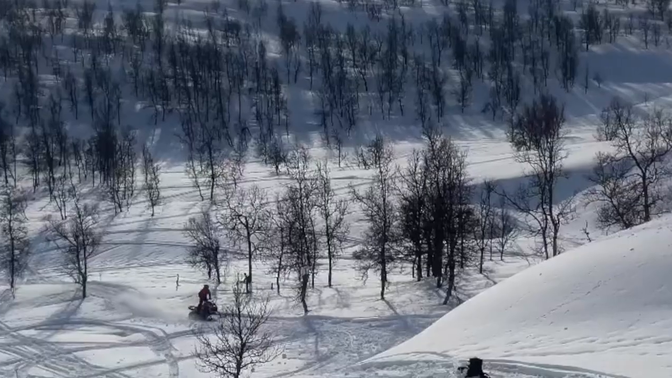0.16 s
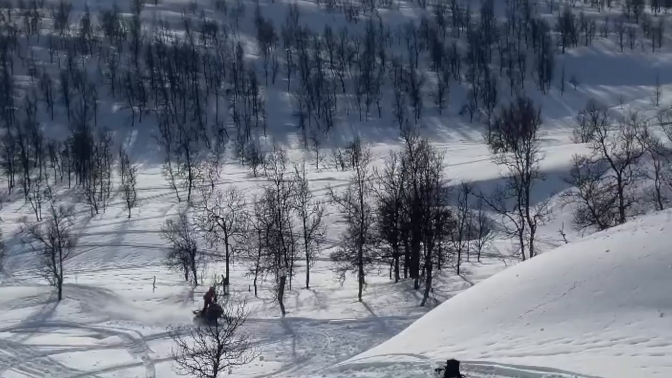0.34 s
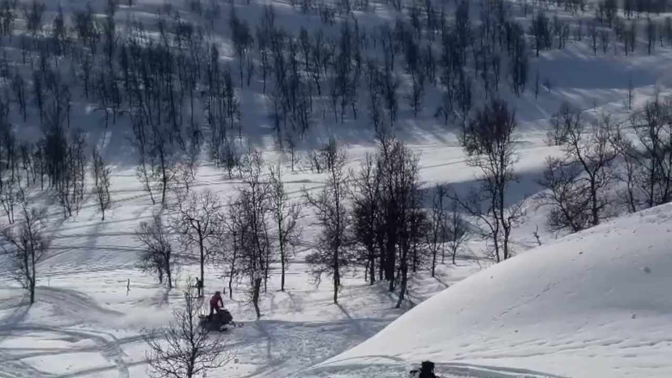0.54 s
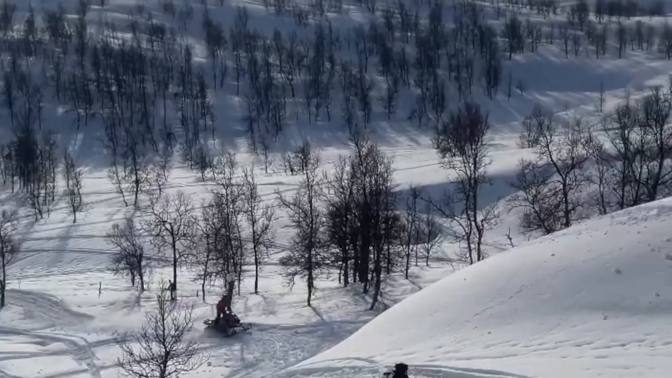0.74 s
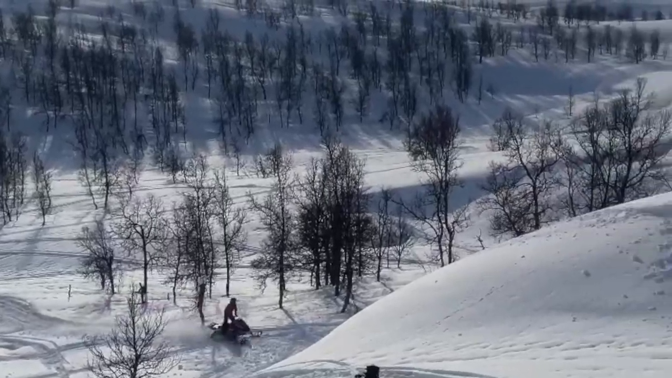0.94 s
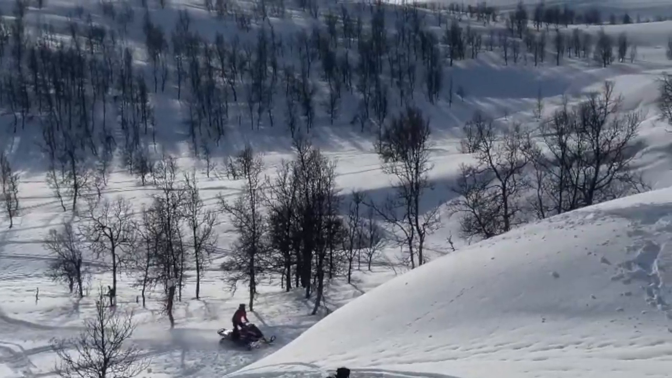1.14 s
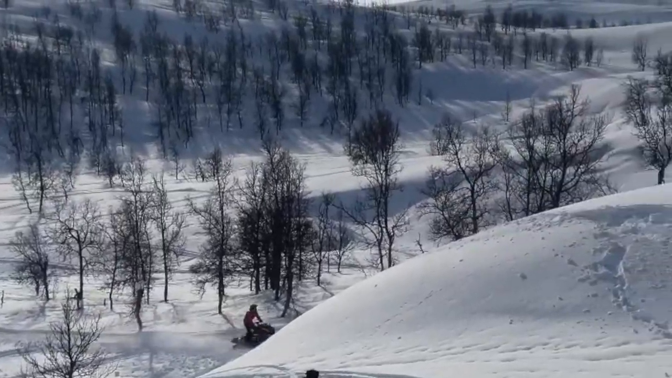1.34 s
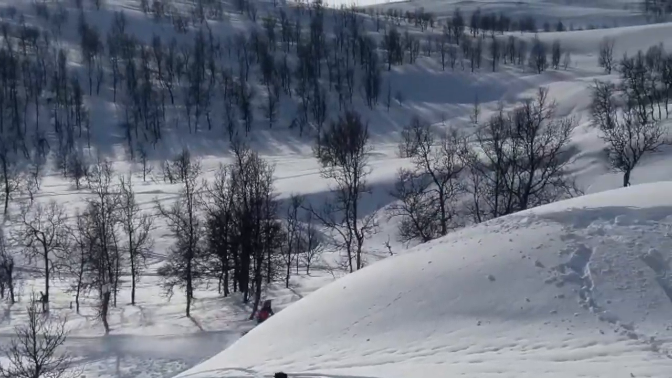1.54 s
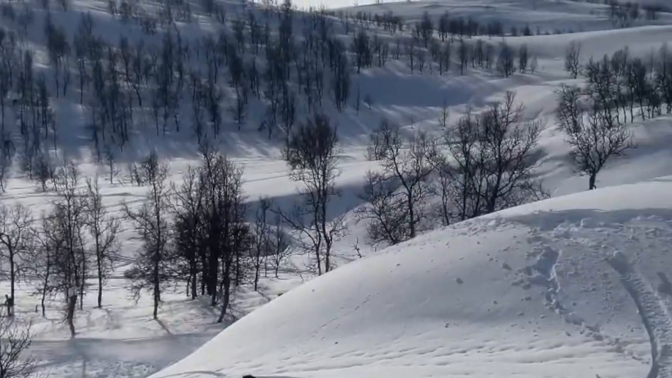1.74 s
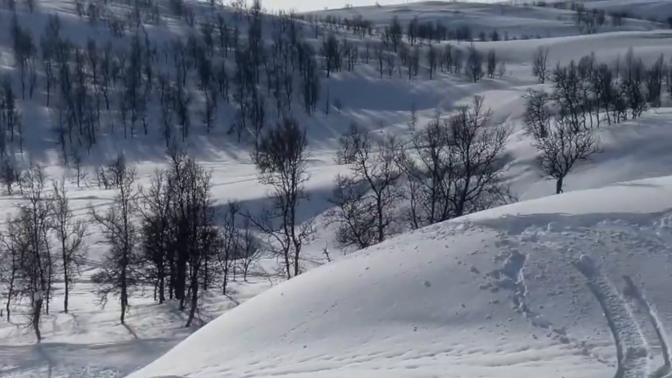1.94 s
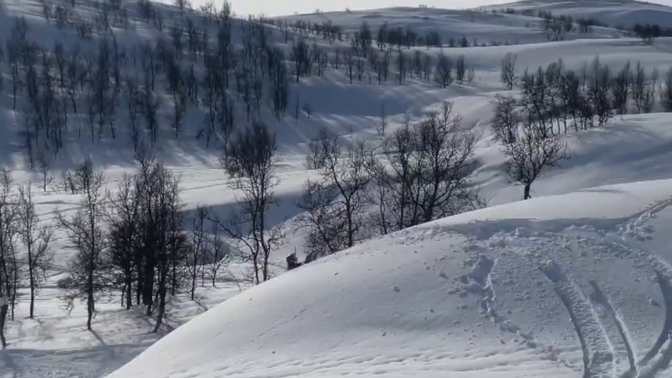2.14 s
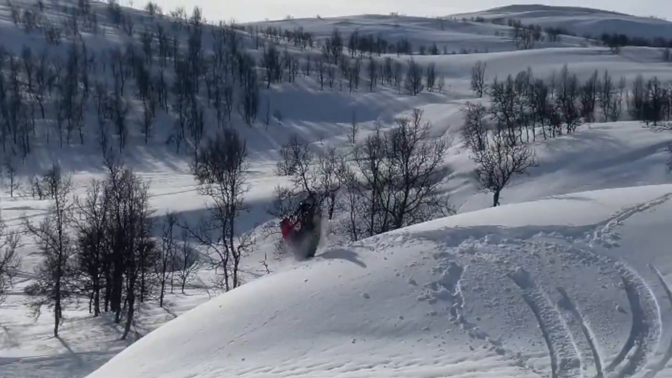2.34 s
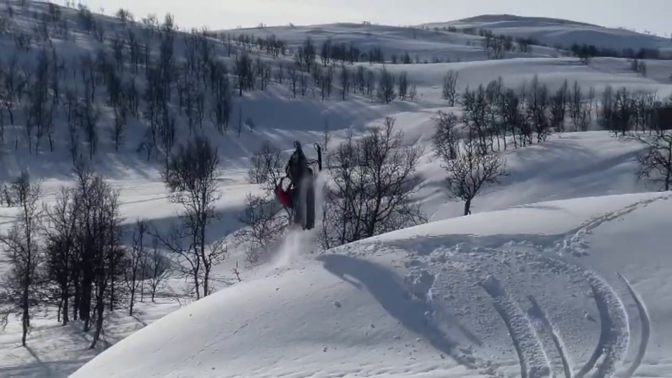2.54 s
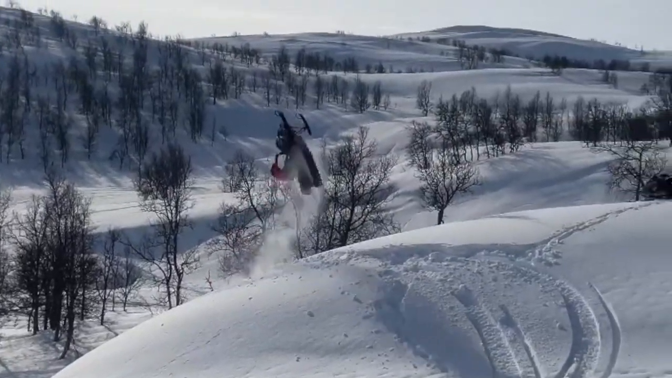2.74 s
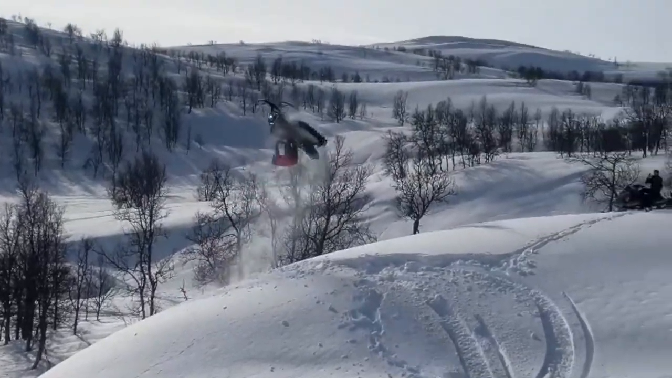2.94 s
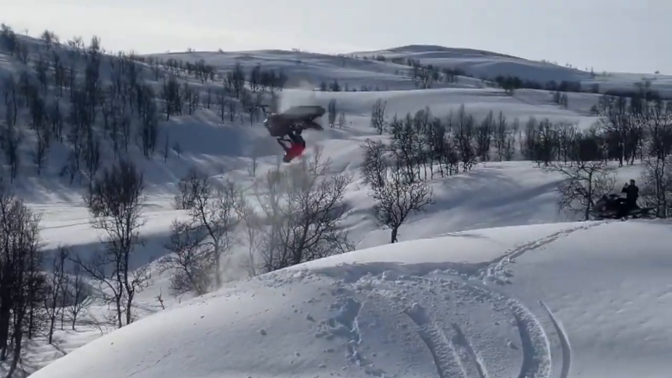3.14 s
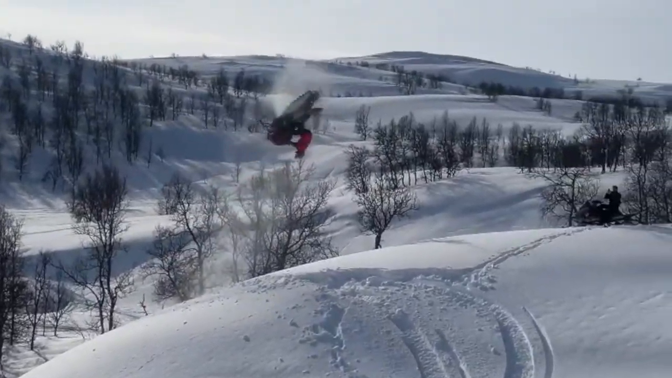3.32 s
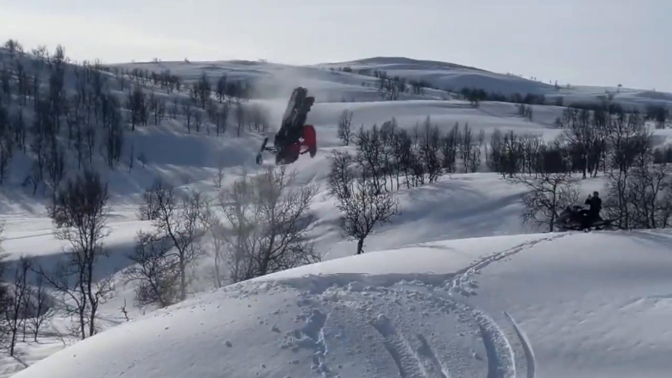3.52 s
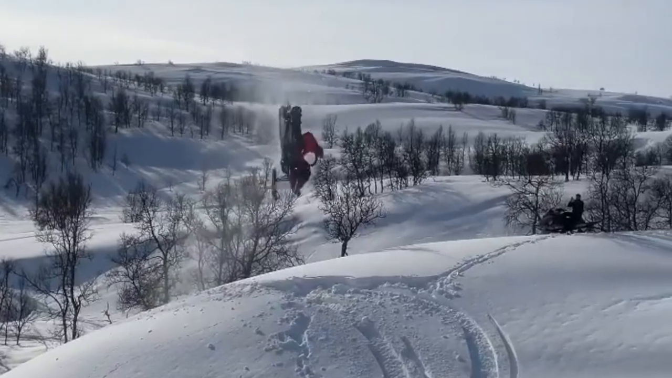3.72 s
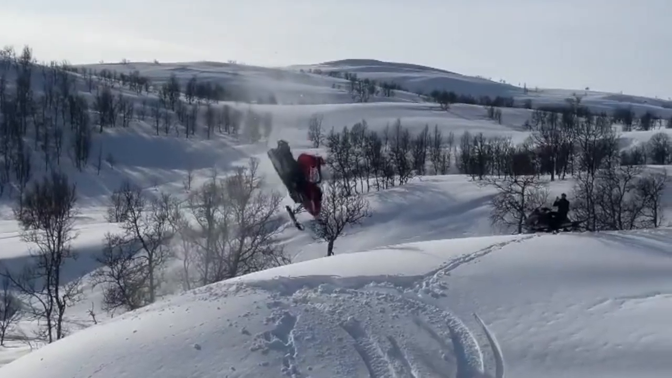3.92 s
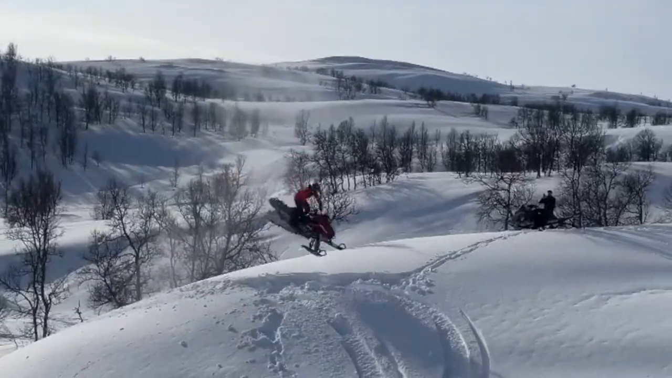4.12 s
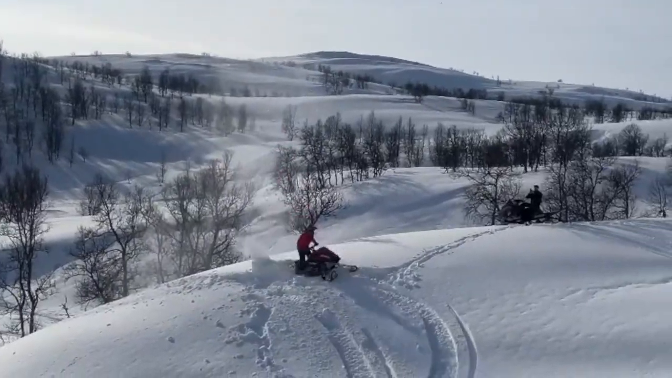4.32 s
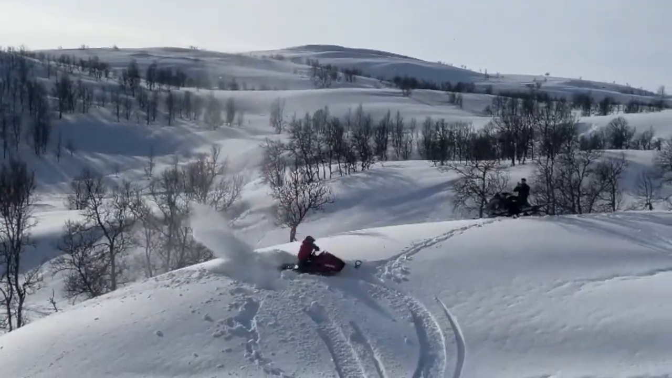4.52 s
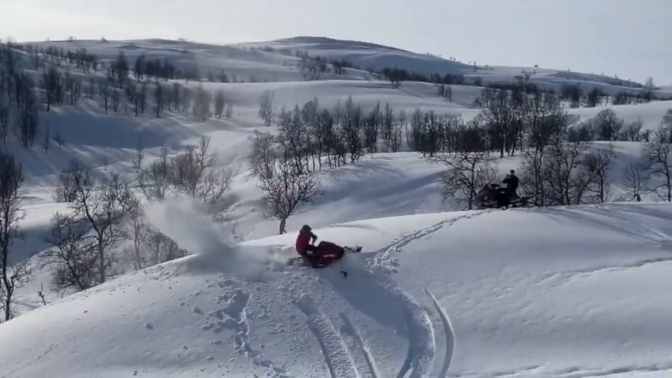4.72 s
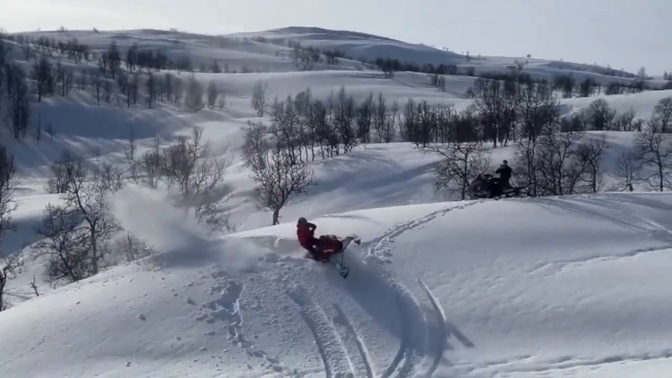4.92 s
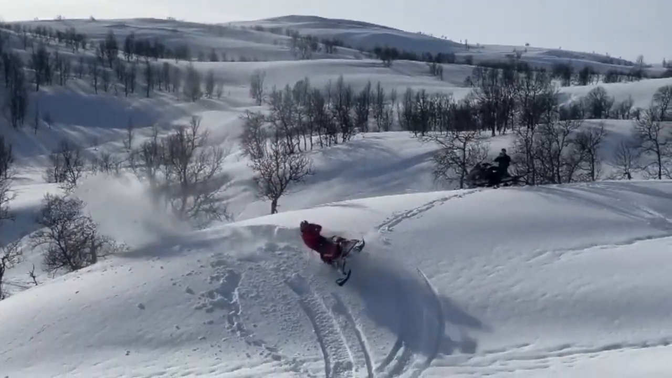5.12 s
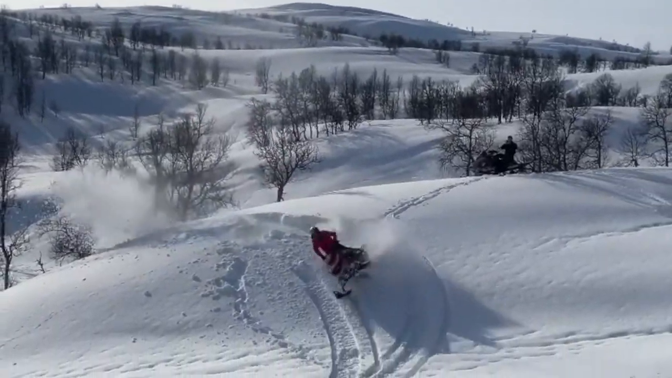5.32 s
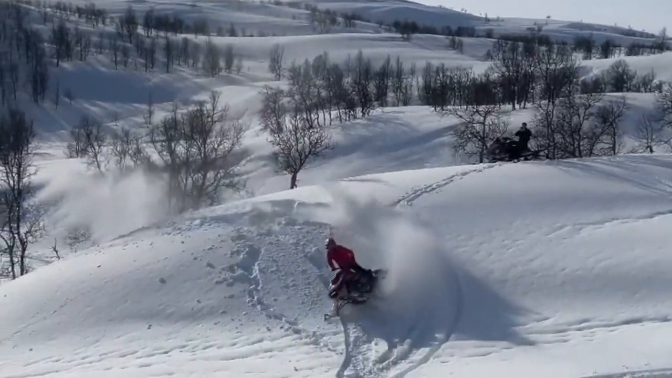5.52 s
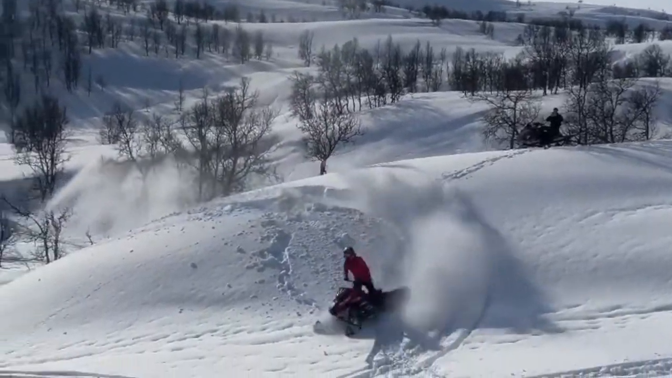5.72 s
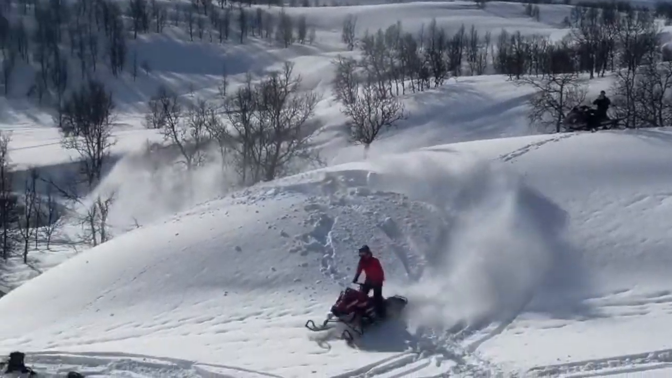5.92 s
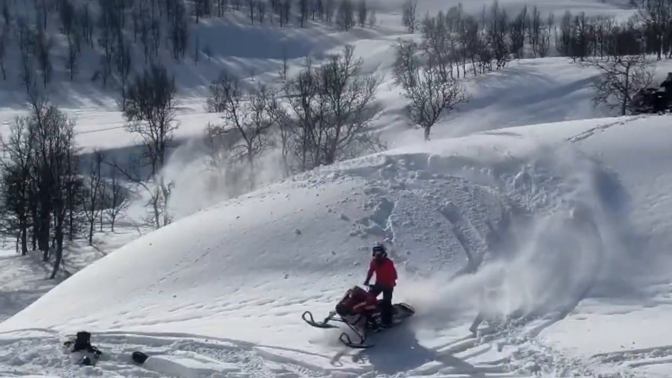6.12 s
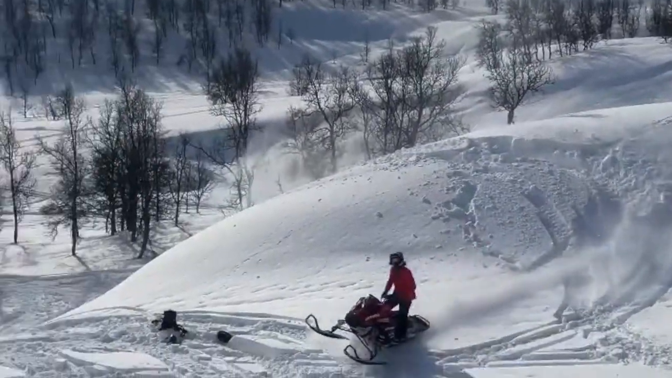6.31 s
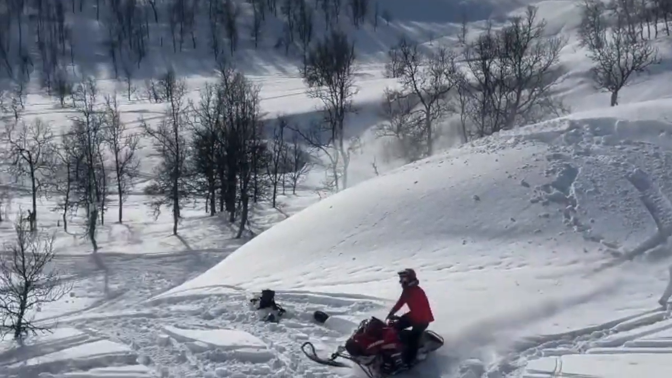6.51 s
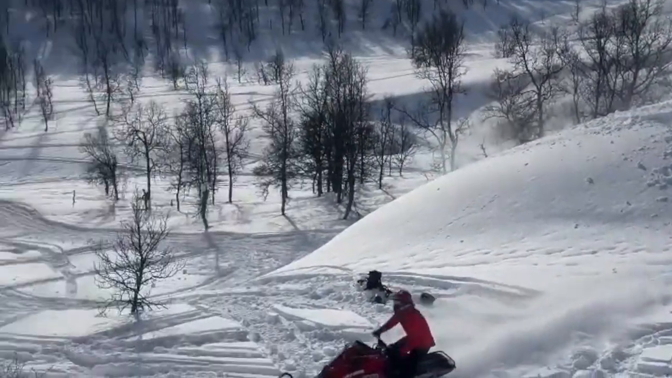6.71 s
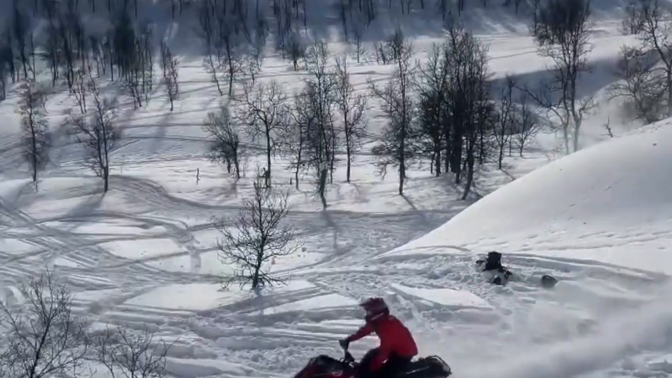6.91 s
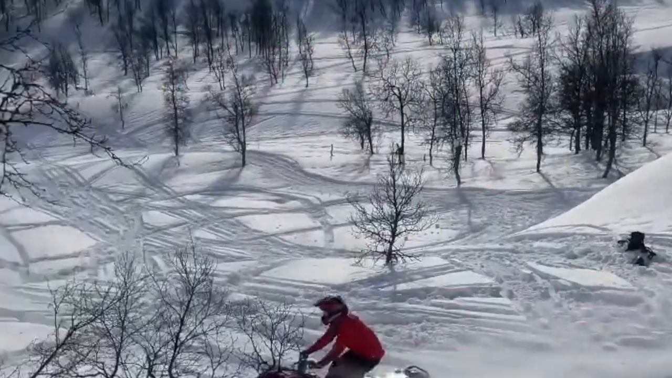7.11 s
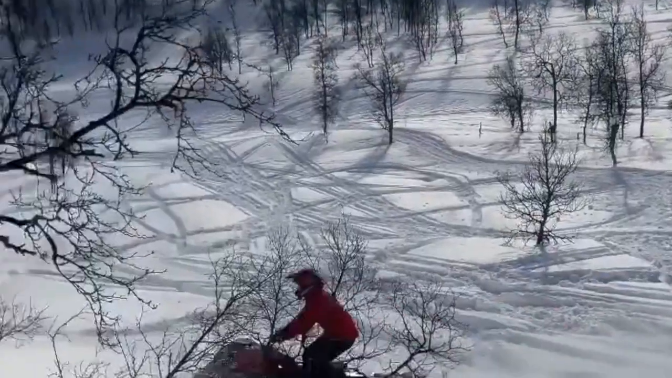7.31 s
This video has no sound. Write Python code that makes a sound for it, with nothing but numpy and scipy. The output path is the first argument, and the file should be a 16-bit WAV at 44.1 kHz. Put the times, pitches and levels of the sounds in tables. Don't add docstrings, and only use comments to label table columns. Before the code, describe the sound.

A snowmobile heard from a close handheld stereo microphone on a snowy slope: after an abrupt engine snippet and gap, thin nasal revs rise and dip far away. A sudden full-throttle blare follows, easing in pulses while the track whirs upward and wind buffets. Dull landing blows, renewed revving and churning spray come nearer, then only falling track whine, low wind and a last knock.

```python
import sys
import numpy as np
from scipy import signal
from scipy.fft import rfft, irfft
from scipy.io import wavfile
from scipy.ndimage import uniform_filter1d

SR = 44100
rng = np.random.default_rng(int(sys.argv[2]) if len(sys.argv) > 2 else 0)


def waveform_to_disk(signal):
    frames = np.transpose(np.atleast_2d(signal))
    scaled = np.clip(frames, -1, 1) * 32767
    samples = np.round(scaled).astype(np.int16)
    wavfile.write(sys.argv[1], SR, samples)


def ratio_of_db(decibels):
    return 10 ** (np.asarray(decibels, float) / 20)


N = 328913
T = np.arange(N) / SR
HZ = np.fft.rfftfreq(N, 1 / SR)


def colour(table, hz):
    f, v = np.transpose(table)
    return np.interp(np.log(hz + 1), np.log(f + 1), v)


def on_hz(table):
    return colour(table, HZ)


def columns(*tables):
    s, *cols = np.transpose(np.vstack(tables))
    return [np.interp(T, s, c) for c in cols]


def unit(x):
    return x / np.sqrt(np.mean(x ** 2))


def walk(rate):
    k = int(SR / rate)
    held = np.repeat(rng.standard_normal(N // k + 1), k)
    slewed = uniform_filter1d(uniform_filter1d(held, k), k)
    return 1.4 * slewed[:N]


def window(t0, t1, fade):
    return np.clip(np.minimum(T - t0, t1 - T) / fade, 0, 1)


def bumps(rows):
    return sum(db * np.exp(-((T - s) / half_s) ** 2) for s, half_s, db in rows)


def order(turns, k, db, fade_db, lag):
    level = np.sqrt(2) * ratio_of_db(db + fade_db * walk(12))
    phase = 2 * np.pi * k * turns - lag * k + .3 * walk(25)
    return level * np.sin(phase)


# frequency in Hz, likeness 0-1.
PORT_LIKENESS = [(60, .99), (500, .98), (1000, .95), (2000, .78), (4000, .8), (8000, .7)]


def noise(spectrum, lo_hz, hi_hz, flicker_db):
    shape = ratio_of_db(on_hz(spectrum))
    alike = np.clip(on_hz(PORT_LIKENESS), -1, 1)
    mid, side = rfft(rng.standard_normal((2, N)))
    mid, side = mid * np.sqrt(1 + alike), side * np.sqrt(1 - alike)
    pair = shape * np.array([mid + side, mid - side])
    out = 0
    for centre in np.arange(np.log2(lo_hz) - 2, np.log2(hi_hz) + 2, 1.):
        band = np.cos(np.pi / 2 * np.clip(np.log2(HZ + 1) - centre, -1, 1)) ** 2
        out = out + irfft(pair * band, N) * ratio_of_db(flicker_db * walk(14))
    inside = irfft(shape * mid * (HZ > lo_hz) * (HZ < hi_hz), N)
    return out / np.sqrt(np.mean(inside ** 2))


# start in seconds, firing rate aimed at in Hz, time constant in seconds,
# exhaust level aimed at in dB.
THROTTLE_MOVES = [(0.168, 220.4, 0.036, -38), (0.234, 311.2, 0.258, -21), (0.41, 247.8, 0.042, -31.5),
                  (0.527, 215.3, 0.093, -37), (0.645, 215, 0.086, -35.5), (0.91, 244, 0.15, -30.5),
                  (1.063, 208.9, 0.049, -38), (1.209, 270.4, 0.5, -36), (1.364, 197.1, 0.094, -43.5),
                  (1.541, 296.6, 0.29, -25), (1.672, 204, 0.12, -40), (1.921, 306.6, 0.31, -36.5),
                  (2.161, 267.5, 0.56, 0.5), (2.349, 287.8, 0.063, -12), (2.542, 258.3, 0.49, -5),
                  (2.806, 245.1, 0.039, -17), (2.86, 252.2, 0.09, -14), (3.189, 273.5, 0.16, -13),
                  (3.494, 246.7, 0.056, -21), (3.676, 268.6, 0.17, -17), (4.052, 235.6, 0.041, -27.5),
                  (4.145, 246.4, 0.08, -13), (4.347, 170.1, 0.12, -29), (4.473, 295.7, 0.39, -19.5),
                  (4.64, 284.2, 0.088, -16.5), (5.339, 260.1, 0.4, -9.5), (5.633, 267.8, 0.065, -21.5),
                  (5.833, 292.5, 0.24, -13), (6.176, 278.7, 0.32, -13.5), (6.571, 234.5, 0.058, -12)]


def throttle():
    out = np.zeros((2, N))
    out[:] = [[227.3], [-33.5]]
    for s, hz, lag_s, db in THROTTLE_MOVES:
        i = int(s * SR)
        aim = np.array([[hz], [db]])
        lag = lag_s * np.array([[1], [0.37]])
        out[:, i:] = aim + (out[:, i - 1:i] - aim) * np.exp(-(T[i:] - s) / lag)
    return out


# time in seconds, nearness in dB, pipe turned this way in dB,
# pipe clear of the snow in dB, silencer in view in dB.
SLED_POSE = [(.2, 2, -9, 4, 6), (.5, 6, -5, -4, -5), (1.02, 1, -1.5, 6, 1), (1.35, 2, 0.5, 5, 12.5),
             (1.6, 0.5, -5.5, -1.5, -9), (2.2, -3.5, -4.5, -9, -4), (2.34, 6.5, -3.5, 0.5, 0),
             (2.7, -3, 3, 0.5, 1.5), (3.0, 0, 3.5, -2, 7.5), (3.4, 2.5, -9.5, -1.5, -9),
             (3.7, -4.5, 6, 2, -0.5), (4.25, -1, 2.5, -4.5, -2.5), (4.64, -14.5, 5, 6.5, -3),
             (5.0, 0.5, 3, 1, 9), (5.45, 0, 3, 6, 8), (5.75, 3, -10, -9, -5), (5.95, -1.5, 6.5, 6.5, 10.5),
             (6.4, 0, 6, 0.5, 4)]
# centre in seconds, half width in seconds, depth in dB.
SNOW_CANCELS = [(1.2, 0.056, -5), (1.72, 0.1, -4.5), (2.57, 0.053, -9), (3.11, .02, -5.5),
                (3.54, 0.013, -12), (4.84, 0.098, -2.5), (5.9, 0.066, -2), (6.36, 0.19, -13)]
# time in seconds, roughness 0-1.
FIRING_ROUGHNESS = [(0, .55), (1.8, .5), (2.3, .6), (2.65, .35), (3.0, .4), (4.3, .5), (4.6, .25), (7, .3)]
# frequency in Hz, level in dB.
PIPE_COLOUR = [(600, 5.5), (850, 4), (1000, 6.5), (1150, -4.5), (1500, -3.5), (1900, -10), (2300, -23),
               (3000, -52)]
# frequency over its main peak as a ratio, level in dB.
SILENCER_COLOUR = [(.5, -17.5), (.87, -6.5), (1.0, 7.5), (1.13, -8.5), (1.24, 5), (1.35, -46), (1.5, -12.5),
                   (2.2, -27.5)]
# time in seconds, peak
# in Hz.
SILENCER_PEAK = [(0, 2080), (2.3, 2360), (2.5, 2274), (3.3, 2203), (3.8, 2328), (4.25, 2170), (4.9, 2438),
                 (5.2, 2453), (5.6, 2113), (6.0, 2426), (6.6, 2650)]


def engine(hz, effort_db, lift_db):
    near_db, aim_db, clear_db, view_db = columns(SLED_POSE)
    level_db = effort_db + near_db
    first_db = level_db + bumps(SNOW_CANCELS)
    second_db = level_db - 6.5 + aim_db
    pipe_db = level_db - 16.5 + clear_db
    silencer_db = level_db - 27.5 + view_db
    rough, = columns(FIRING_ROUGHNESS)
    peak_hz, = columns(SILENCER_PEAK)
    half_db = -20.5 - 0.7 * lift_db + 16.4 * rough

    turns = np.cumsum(hz * (1 + .008 * rough * walk(70))) / SR
    size = np.interp(turns, np.arange(4000), rng.standard_normal(4000))
    sound = order(turns, 1, first_db, 10.5 * rough, 0)
    sound = sound + order(turns, 2, second_db, 5 * rough, 0.05)
    sound = sound + order(turns, .5, level_db + half_db - 9, 3, 0)
    fade_db = 2.6 + 2 * rough
    for k in np.arange(2.5, 21, .5):
        pipe = ratio_of_db(pipe_db + colour(PIPE_COLOUR, k * hz))
        silencer = ratio_of_db(silencer_db + np.interp(k * hz / peak_hz, *np.transpose(SILENCER_COLOUR)))
        line = order(turns, k, half_db * (k % 1 > 0), fade_db, .9 + .05 * k)
        sound = sound + (pipe + silencer) * line
    puff = 0.93 + np.exp(-(turns % 1) / 0.14)
    running = window(.1, 6.586, .012)
    return running * sound * ratio_of_db(2.45 * rough * size), unit(puff * ratio_of_db(2.0 * size))


# time in seconds, lug rate in Hz, hum in dB.
TRACK_GLIDES = [
    [(2.25, 46, -50.5), (2.4, 55, -47), (2.64, 83, -24), (2.72, 90, -30.5), (2.87, 110.6, -15),
     (3.06, 111, -22), (3.3, 116, -27), (3.7, 107.5, -31.5), (4.35, 95, -34.5)],
    [(4.45, 74.4, -30.5), (4.65, 81, -41.5), (4.95, 120.3, -23), (5.3, 142.4, -29), (5.5, 137, -22),
     (5.84, 102, -30), (6.03, 109.7, -23), (6.35, 130, -22), (6.55, 132, -19)],
    [(6.62, 127.9, -19), (6.72, 103.6, -35), (6.8, 98.5, -32), (7.03, 91.1, -33.5), (7.19, 82, -36),
     (7.35, 70.2, -34), (7.46, 66, -40.5)],
]
# frequency in Hz, level in dB.
TUNNEL_COLOUR = [(400, -1), (800, -14), (980, -2), (1200, -12), (1950, -11), (2120, 0), (2300, -12),
                 (3000, -26)]


def track():
    hz, hum_db = columns(*TRACK_GLIDES)
    flutter = .008 + .03 * window(2.6, 4.4, .3)
    turns = np.cumsum(hz * (1 + flutter * walk(40))) / SR
    early = T < 4.4
    high_db = hum_db - 4 - 19 * window(4.0, 6.7, 0.027) - 1.5 * early
    hum = order(turns, 0.98, hum_db - 6.5 - 16.5 * early, 1.7, 0)
    hum = hum + order(turns, 2, hum_db, 1.2, 0)
    for k in range(3, 34):
        slap_db = high_db + colour(TUNNEL_COLOUR, k * hz) - 6 * (k % 2) - .8 * k * early
        hum = hum + order(turns, k, slap_db, 3, .21 * k)
    return hum * (window(1.5, 4.4, 0.082) + window(4.42, 8, 0.23))


# start in seconds, level in dB, pitch in Hz, time to fall 60 dB in seconds.
LANDING_THUDS = [
    (4.329, -19, 113.6, 0.096),
    (4.352, -26, 46, 0.12),
    (4.463, -18.5, 72, 0.024),
    (7.44, -17.5, 58.5, 0.03),
]


def landing():
    out = 0
    for s, db, hz, t60 in LANDING_THUDS:
        age = np.clip(T - s, 0, 1)
        out = out + ratio_of_db(db) * np.sin(2 * np.pi * hz * age) * np.exp(-np.log(1000) * age / t60)
    return out


# time in seconds, level in dB.
SPRAY_LEVEL = [(0.16, -52.5), (0.32, -49.5), (0.85, -52), (1.31, -47.5), (1.94, -72.5), (2.13, -66.5),
               (2.31, -39.5), (2.49, -38), (3.33, -31), (3.61, -37), (3.79, -34.5), (4.14, -36),
               (4.28, -34.5), (4.5, -48), (4.95, -40), (6.53, -37.5), (6.66, -49), (7.45, -49)]
# frequency in Hz, level in dB per Hz.
HISS_COLOUR = [(1500, -18.5), (2600, 1.5), (3200, 1), (3700, -3), (5900, -1), (7000, -9.5), (9500, -7.5),
               (11000, -36)]
# frequency in Hz, level in dB per Hz.
CHURN_COLOUR = [(45, -35.5), (120, -5.5), (220, 8), (420, 2.5), (1600, 1.5), (2500, -4.5), (3200, -34),
                (4500, -48)]
# centre in seconds, half width in seconds, swell in dB.
WIND_GUSTS = [(.64, .04, -1), (1.5, .15, 6.5), (2.0, .25, 5.5), (2.6, .15, -5), (2.88, .04, 16),
              (3.58, .06, 16.5), (4.1, 0.092, 17), (5.65, 0.3, 4), (6.64, .08, 10), (7.0, 0.31, 12.5)]


def snow(puff, lift_db):
    spray_db, = columns(SPRAY_LEVEL)
    hiss_db = spray_db + 0.38 * lift_db
    churn_db = -6 + 0.66 * hiss_db
    rumble_db = -51 + 0.13 * spray_db + bumps(WIND_GUSTS)
    rumble_colour = [(15, -34), (32, -29.5), (60, -8.5), (110, -4.5), (200, -8.0), (400, -66.0)]  # Hz, dB
    hiss = ratio_of_db(hiss_db) * (0.48 + 0.5 * puff) * noise(HISS_COLOUR, 2470, 7400, 1.33)
    churn = ratio_of_db(churn_db) * (.5 + 0.66 * puff) * noise(CHURN_COLOUR, 300, 2600, 0.89)
    rumble = ratio_of_db(rumble_db) * noise(rumble_colour, 36, 110, 1.4)
    return hiss + churn + rumble


def trees(direct):
    age = np.arange(SR // 2) / SR
    scatter = rng.standard_normal((2, len(age))) * np.exp(-age / 0.23) * (age > .01)
    return signal.fftconvolve(direct[None], scatter, axes=1)[:, :N] * ratio_of_db(-51)


def scrap():
    age = (T * 213 + 0.63) % 1 / 213
    band = signal.butter(6, (1500, 6500), "bandpass", fs=SR, output="sos")
    gas = signal.sosfilt(band, rng.standard_normal(N)) * np.exp(-age / 0.0016)
    rise = np.clip(age / 0.0007, 0, 1)
    tones = np.sin(2 * np.pi * 1900 * age) + 0.66 * np.sin(2 * np.pi * 650 * age)
    ring = rise * tones * np.exp(-age / 0.00085)
    boom = np.sin(2 * np.pi * 124 * T)
    return ratio_of_db(-19.5) * boom + ratio_of_db(-10.5) * ring + ratio_of_db(-18.5) * gas


# frequency in Hz, left over right in dB.
PORT_LEVEL = [(60, -1), (150, 0.5), (330, 4.5), (1050, 1), (1860, -2), (3300, -6), (5850, 0.5), (10400, -1)]
# frequency in Hz, left's lead in radians.
PORT_PHASE = [(200, -.05), (1100, -.7), (2200, -1.1), (3500, .5), (4400, 1.1), (5500, 1.1), (7000, 2.4),
              (9400, 2.3)]


def ports(x):
    tilt = ratio_of_db(on_hz(PORT_LEVEL) / 2) * np.exp(.5j * on_hz(PORT_PHASE))
    left, right = rfft(x) * np.array([tilt, 1 / tilt]) * (HZ < 9700)
    mid = (left + right) / 2 * ((HZ < 6950) | (HZ > 8250))
    mid = mid * ratio_of_db(-6 * np.exp(-((HZ - 3250) / 130) ** 2))
    side = (left - right) / 2
    return irfft(np.array([mid + side, mid - side]), N)


def scene():
    hz, effort_db = throttle()
    lift_db = effort_db - uniform_filter1d(effort_db, size=SR // 2)
    motor, puff = engine(hz, effort_db, lift_db)
    direct = np.tanh(1.055 * (motor + track())) / 1.474
    direct = signal.sosfilt(signal.butter(4, 70, "highpass", fs=SR, output="sos"), direct)
    direct = direct + landing()
    now = ports(direct + snow(puff, lift_db) + trees(direct)) * (T > .1546)
    before = scrap() * (window(-1, .029, .004) + ratio_of_db(-45) * window(-1, .065, .03))
    return now + before


def low_pass(x):
    return signal.sosfilt(signal.butter(12, 10980, fs=SR, output="sos"), x)


def record(dry):
    return low_pass(dry)


dry = scene()
out = record(dry)
waveform_to_disk(out)
```